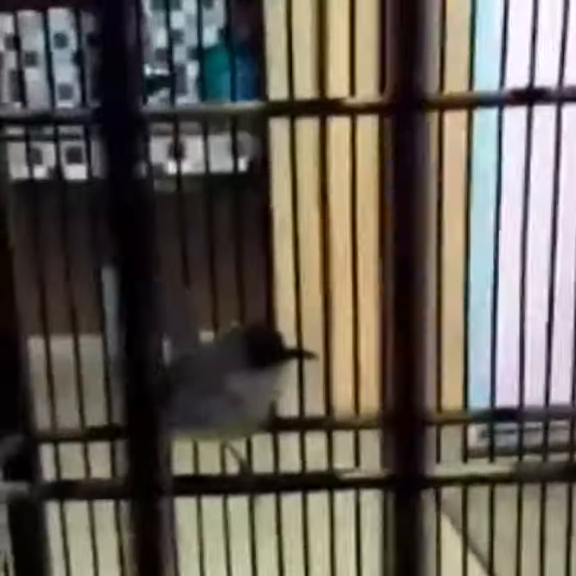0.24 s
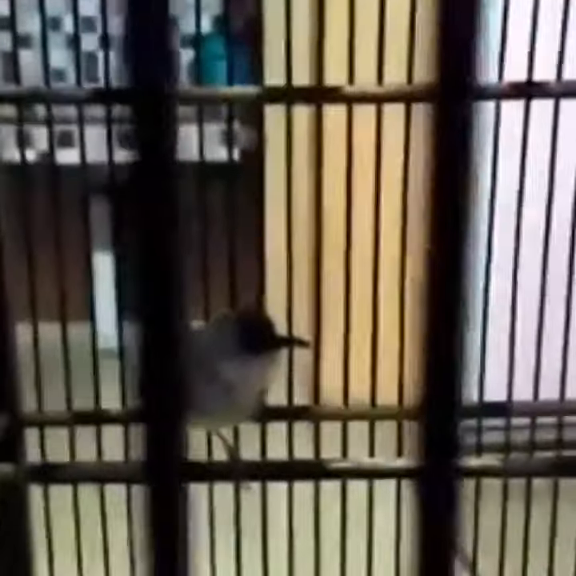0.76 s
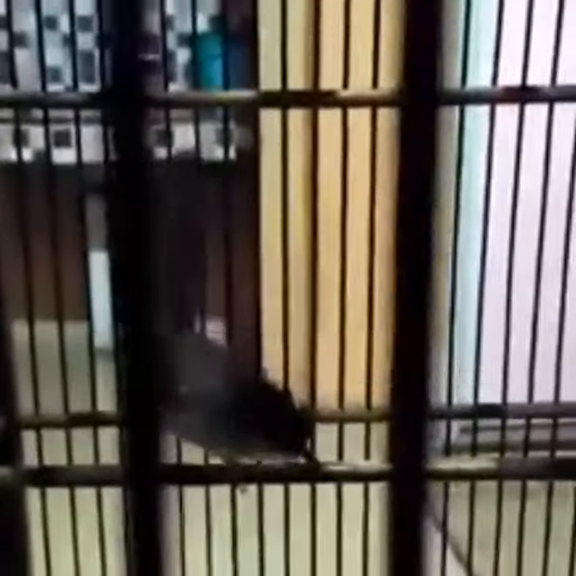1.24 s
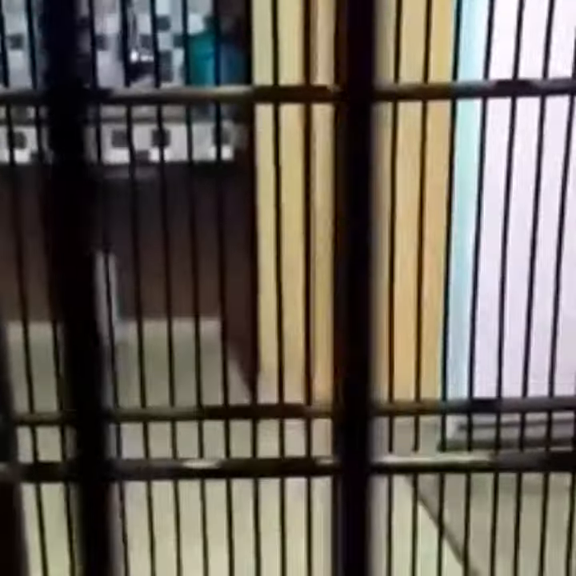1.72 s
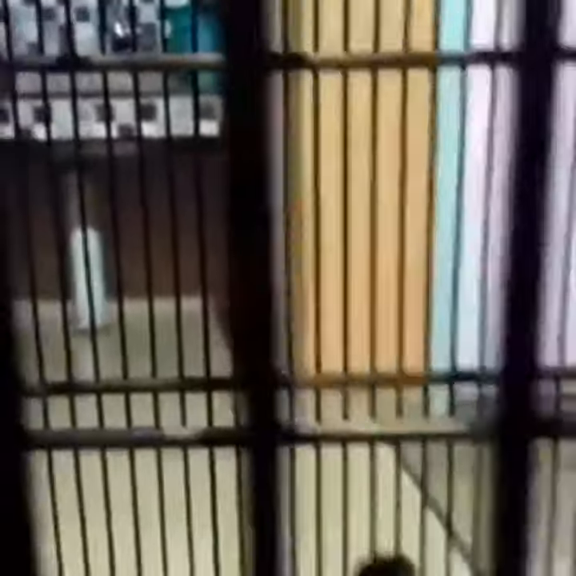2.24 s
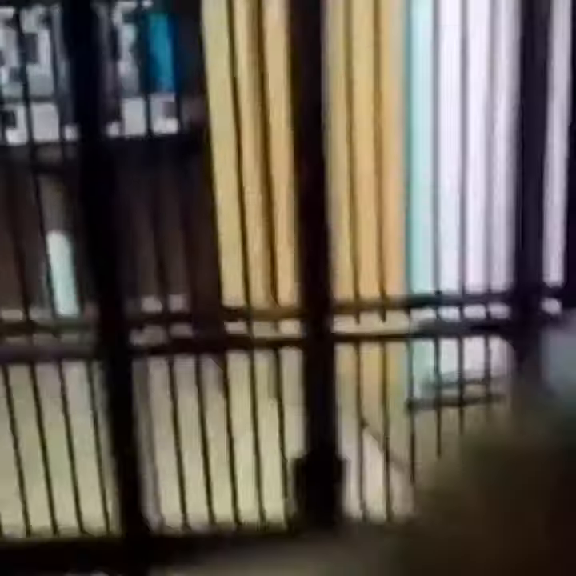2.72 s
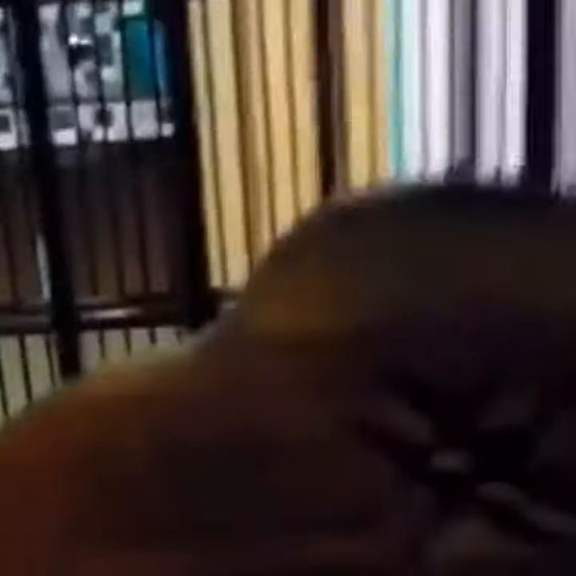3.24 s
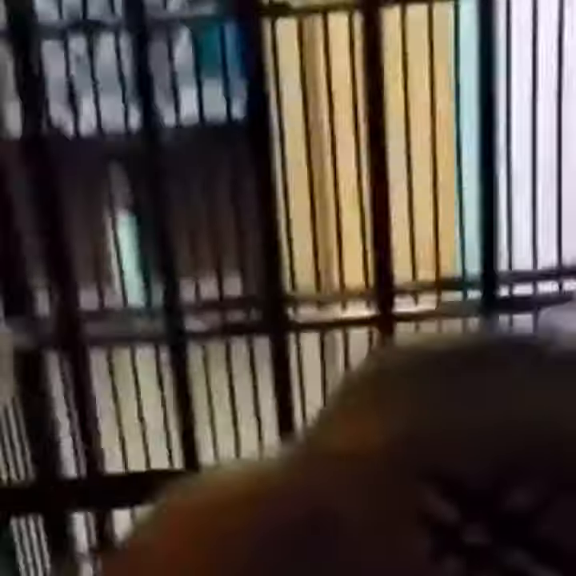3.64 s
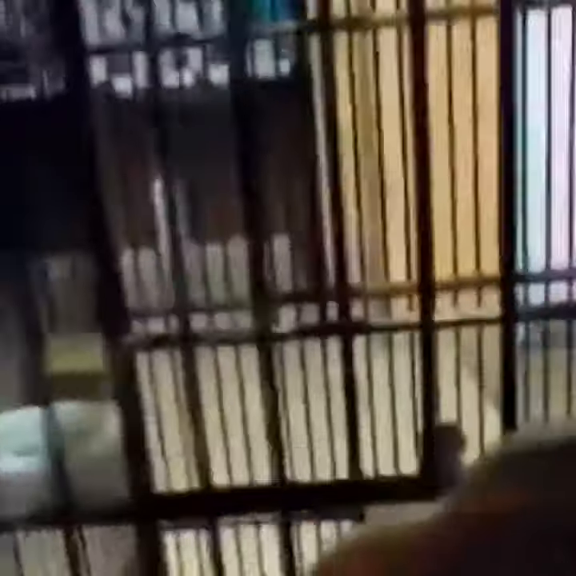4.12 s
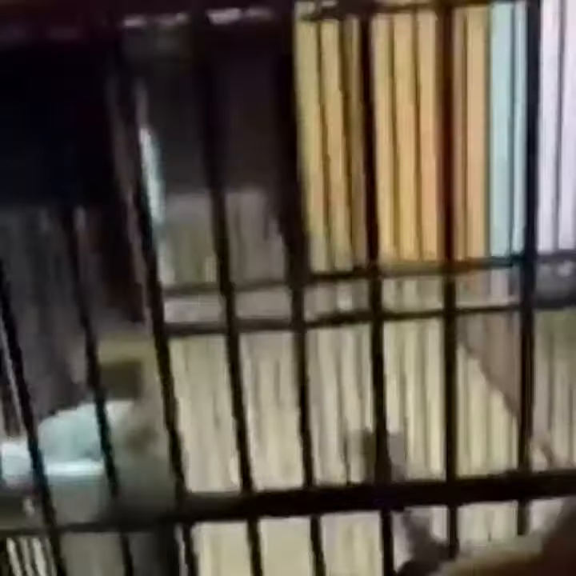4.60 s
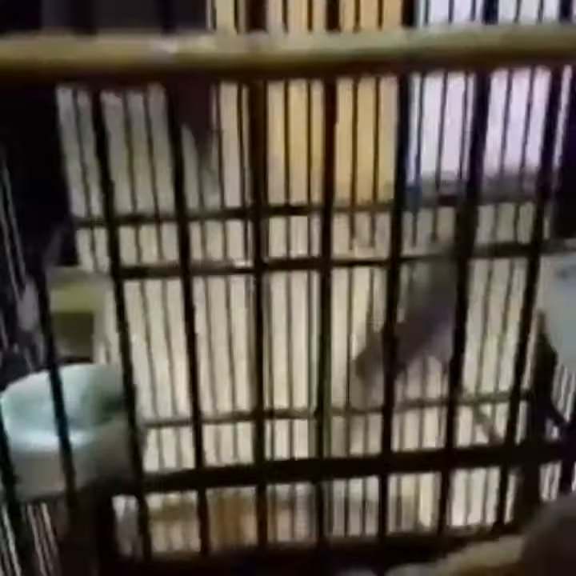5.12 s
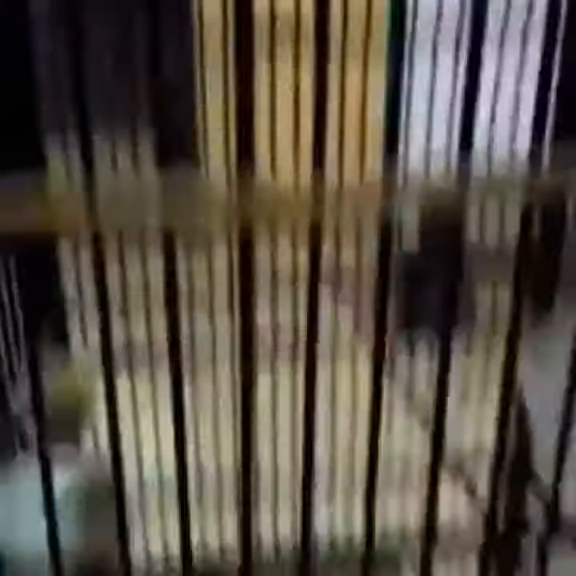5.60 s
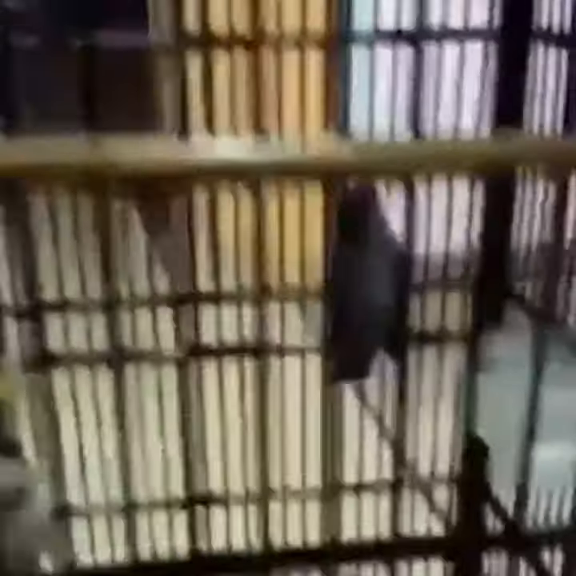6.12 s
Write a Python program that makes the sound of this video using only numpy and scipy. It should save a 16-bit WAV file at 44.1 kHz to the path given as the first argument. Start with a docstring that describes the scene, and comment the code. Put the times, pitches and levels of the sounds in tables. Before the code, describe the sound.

A small caged bird sings three fast runs of sharp chips over a dry rasp, with sliding buzzy wheezes and low whistles in a hard-walled room.

```python
"""A small caged bird sings in a hard-walled room: three runs of sharp down-swept chips over a dry rasp.
Buzzy wheezes slide down after two of the runs; an earlier one follows two high peeps.
Low whistles lead into two runs. A harsh hiss sounds twice, the first time just ending at the start.
Chips and whistles are swept sines; rasp, wheezes, peeps and hisses are uneven snaps plus air, filtered.
A hand rubs and bumps the camera, whose gain control ducks the room noise. Levels are set before it."""
import sys
import numpy as np
from scipy import signal
from scipy.fft import rfft, irfft, next_fast_len
from scipy.io import wavfile
from scipy.ndimage import uniform_filter1d, map_coordinates

SR = 44100
rng = np.random.default_rng(int(sys.argv[2]) if len(sys.argv) > 2 else 0)


def persist_wave(psi):
    """Save psi, clipped to +-1, as 16-bit WAV."""
    counts = np.round(np.clip(psi, -1, 1) * 32767).astype(np.int16)
    wavfile.write(sys.argv[1], SR, np.atleast_2d(counts).T)


N = 280035


def amp(db):
    """Decibels to gain."""
    return 10 ** (np.asarray(db) / 20)


def unit(x):
    """Scale to rms 1."""
    return x / np.sqrt(np.mean(x ** 2) + 1e-20)


def along(points, hz):
    """Read (Hz, value) points on a log frequency axis."""
    f, v = np.transpose(points)
    return np.interp(np.log(hz + 1), np.log(f + 1), v)


def wobble(knots_per_s):
    """A smooth random curve through normally distributed knots."""
    knots = rng.standard_normal(int(N * knots_per_s / SR) + 4)
    return map_coordinates(knots, [np.arange(N) * knots_per_s / SR])


def since(start_s):
    """Seconds from start_s, for every sample."""
    return np.arange(N) / SR - start_s


ONSET_DB = 30  # below full level at the start


def envelope(start_s, attack_s, length_s, release_db_per_s):
    """Gain that rises through the attack, holds until length_s after the start, then dies away."""
    u = since(start_s)
    rising = np.maximum(1 - u / attack_s, 0)
    db = -ONSET_DB * rising ** 2 - release_db_per_s * np.maximum(u - length_s, 0)
    return amp(np.maximum(db, -200))


def filtered(x, response):
    """x times a response of frequency."""
    m = next_fast_len(N + SR // 2)
    return irfft(rfft(x, m) * response(np.fft.rfftfreq(m, 1 / SR)), m)[..., :N]


def coloured(x, colour):
    """x weighted by a colour table, at rms 1."""
    return unit(filtered(x, lambda hz: amp(along(colour, hz))))


# left-right correlation of diffuse noise: freq_hz, likeness
ALIKE = [(100, 0.93), (1000, 0.96), (3000, 0.96), (6300, 0.92), (10000, 0.57)]


def diffuse(colour):
    """Stereo noise of rms 1 from all sides: a mid-side balance sets the likeness of the channels."""
    def balance(hz):
        turn = np.arccos(np.clip(along(ALIKE, hz), -1, 1)) / 2
        return np.array([np.cos(turn), np.sin(turn)])

    mid, side = filtered(rng.standard_normal((2, N)), balance)
    return coloured(np.array([mid + side, mid - side]), colour)


def buzz(rate_hz, jitter, air):
    """The syrinx snaps at an uneven rate, with rushing air between the snaps."""
    cycles = np.cumsum(rate_hz * np.exp(jitter * wobble(300))) / SR
    snaps = np.diff(np.floor(cycles), prepend=0) * amp(rng.standard_normal(N))
    return unit(unit(snaps) + air * rng.standard_normal(N))


RING_FLUTTER_DB, RING_FLUTTER_KNOTS_PER_S = 3, 45


def resonate(x, rings):
    """Each resonance lifts a narrow band and rings on briefly, swelling and sinking on its own."""
    def bandpasses(f):
        return np.array([1j * f * w / (c * c - f * f + 1j * f * w) for c, w, _ in rings])

    out = x
    for band, (_, _, db) in zip(filtered(x, bandpasses), rings):
        flutter_db = RING_FLUTTER_DB * (wobble(RING_FLUTTER_KNOTS_PER_S) - .5)
        out = out + band * amp(db + flutter_db)
    return unit(out)


def valley_db(hz, valleys):
    """Loss in the narrow bands that the throat does not pass."""
    return sum(db * np.exp(-((hz - c) / w) ** 2) for c, w, db in valleys)


def hollow(x, valleys):
    """x with those bands hollowed out."""
    return filtered(x, lambda hz: amp(valley_db(hz, valleys)))


def patchy(x, depth_db):
    """The sound flickers in patches about 500 Hz wide and 17 ms long."""
    z = signal.stft(x, nperseg=256)[2]
    field = uniform_filter1d(rng.standard_normal(z.shape), size=3, axis=0)
    field = uniform_filter1d(field, size=6, axis=1)
    return unit(signal.istft(z * amp(depth_db * unit(field)), nperseg=256)[1][:N])


# time for the room's ring to fall 60 dB: freq_hz, t60_s
WALLS = [(300, 0.77), (1300, 0.69), (4000, 0.75), (10000, 0.49)]


def in_room(x, wet_db, width):
    """Direct sound plus the walls' answer: decaying noise that differs a little between the channels."""
    hz, t, z = signal.stft(rng.standard_normal((2, SR * 3 // 4)), SR, nperseg=256)
    decay = amp(-60 * t / along(WALLS, hz)[:, None])
    tail = signal.istft(z * decay, SR, nperseg=256)[1]
    tail = np.pad(tail / np.linalg.norm(tail[0]), ((0, 0), (SR // 200, 0)))  # 5 ms pre-delay
    mid, side = amp(wet_db) * signal.fftconvolve(x[None], tail, axes=1)[:, :N]
    return np.array([x + mid + width * side, x + mid - width * side]) / np.sqrt(1 + amp(wet_db) ** 2)


# spectrum of the room's rush: freq_hz, weight_db
ROOM_COLOUR = [(25, -52), (60, -30.5), (100, -15.5), (300, -10), (480, -10.5), (700, -7.5), (950, -7),
               (1300, -7.5), (1520, -4.5), (1700, 0.5), (1900, -7), (2400, -8.5), (2900, -11),
               (5400, -15.5), (7000, -30), (8200, -36), (10000, -22), (10900, -70), (15000, -68)]
# spectrum of a narrow sizzle high in the room noise: freq_hz, weight_db
SIZZLE_COLOUR = [(4500, -53), (5700, -3), (6100, 4.5), (6350, 12.5), (6600, -3.5), (7100, -9.5),
                 (8000, -47)]


def room_noise(body_db=-59, sizzle_db=-61):
    """Diffuse noise: a rush whose level drifts slowly, and a high sizzle that flickers faster."""
    body = amp(body_db + 1.05 * wobble(4.6)) * diffuse(ROOM_COLOUR)
    return body + amp(sizzle_db + 1.93 * wobble(25)) * diffuse(SIZZLE_COLOUR)


SHIFT_ATTACK_S, SHIFT_RELEASE_DB_PER_S = 0.043, 400
# the hand shifts on the camera: start_s, length_s, rub_db, scratch_db
SHIFTS = [(3.08, 0.14, -67.5, -68), (3.313, 0.091, -53, -65), (3.438, 0.1, -53.5, -74),
          (3.531, 0.16, -54, -83), (3.658, 0.058, -64, -54)]
# spectra of skin on the case: freq_hz, weight_db
RUB_COLOUR = [(50, -42), (120, -31), (175, -19), (270, -5), (450, -16), (800, -22), (1200, 1), (1900, 7.5),
              (3000, 1.5), (4200, -5), (9000, -54)]
SCRATCH_COLOUR = [(2000, -9), (7000, 4.5), (10000, 2.5), (12500, -0.5), (15000, -31)]


def handling():
    """Skin rubs and scratches on the camera's case in uneven slips."""
    rub, scratch = diffuse(RUB_COLOUR), diffuse(SCRATCH_COLOUR)
    slips = unit(amp(1.5 * wobble(110)))
    out = 0
    for s, length, rub_db, scratch_db in SHIFTS:
        friction = amp(rub_db) * rub + amp(scratch_db) * scratch
        out = out + friction * envelope(s, SHIFT_ATTACK_S, length, SHIFT_RELEASE_DB_PER_S)
    return slips * out


# soft bumps of the hand on the camera: start_s, level_db
BUMPS = [(3.364, -48), (3.572, -46.5), (3.584, -56), (3.622, -67), (3.65, -50), (3.682, -49), (3.704, -51)]
# the grip rumbles between the bumps: start_s, length_s, level_db
GRIP_RUMBLE = (3.585, 0.1, -68)
# spectrum through the camera's body: freq_hz, weight_db
BUMP_COLOUR = [(60, -32), (130, -35), (180, 4.5), (280, 4), (450, -12), (620, -12), (850, 1), (1300, -6),
               (3000, -31), (8000, -64)]


def bumps(t60_s=0.056, attack_s=0.0077):
    """Dull, quickly damped knocks through the camera's body, over the rumble of the grip."""
    blows = 0
    for s, db in BUMPS:
        u = since(s)
        blows = blows + amp(db - 60 * np.maximum(u, 0) / t60_s) * np.clip(u / attack_s, 0, 1)
    start, length, level_db = GRIP_RUMBLE
    grip = amp(level_db) * envelope(start, SHIFT_ATTACK_S, length, SHIFT_RELEASE_DB_PER_S)
    return (blows + grip) * coloured(rng.standard_normal(N), BUMP_COLOUR)


HISS_ATTACK_S, HISS_TREBLE_ATTACK_S, HISS_RELEASE_DB_PER_S = 0.087, 0.1, 140
# hisses, with two resonances of their own: start_s, length_s, level_db, strong_ring_hz, upper_ring_hz
HISSES = [(-.1, 0.11, -32.5, 2520, 4040), (4.512, 0.22, -39, 2773, 5440)]
# source spectrum: freq_hz, weight_db
HISS_COLOUR = [(1200, -39), (1750, -13.5), (2050, -7), (2300, 3), (2550, -1.5), (3000, -3.5), (3300, 0.5),
               (3750, -5), (4400, -7), (5500, -7.5), (7100, -4.5), (8600, -20), (10600, -8.5), (12800, -42)]
# shared resonances: centre_hz, width_hz, lift_db (before flutter)
HISS_RINGS = [(1900, 90, -2), (2110, 55, 5), (2560, 45, 8), (3270, 80, 6), (3410, 70, 3), (4480, 45, 0),
              (7050, 80, 2), (10300, 70, 1)]
# valleys between them: centre_hz, width_hz, gain_db
HISS_VALLEYS = [(2250, 65, -10), (2410, 55, -15), (3010, 80, -14), (3660, 110, -10), (3980, 50, -7),
                (4380, 50, -6), (4650, 100, -8), (5380, 70, -6)]


def hiss(ring_width_hz=70, ring_db=13, upper_width_hz=160, upper_db=1, treble_hz=3800):
    """A harsh, breathy buzz through whistling resonances; the treble swells last."""
    out = np.zeros(N)
    source = coloured(buzz(rate_hz=300, jitter=.3, air=2.6), HISS_COLOUR)
    for s, length, db, hz, upper_hz in HISSES:
        own_rings = [(hz, ring_width_hz, ring_db), (upper_hz, upper_width_hz, upper_db)]
        air = hollow(resonate(source, HISS_RINGS + own_rings), HISS_VALLEYS)
        body = filtered(air, lambda f: 1 / (1 + (f / treble_hz) ** 8))
        for band, attack in ((body, HISS_ATTACK_S), (air - body, HISS_TREBLE_ATTACK_S)):
            out += band * amp(db) * envelope(s, attack, length, HISS_RELEASE_DB_PER_S)
    return out * amp(1.1 * wobble(60))


SCOOP_S, DROP_S, WHISTLE_RELEASE_DB_PER_S = 0.041, 0.0577, 1498
DROP_LOSS_DB = 27  # level loss per unit of drop; the overtones lose twice as much again
OVERTONE_FLICKER_DB, OVERTONE_FLICKER_KNOTS_PER_S = 4, 90
OVERTONE_BLUR_RAD, OVERTONE_BLUR_KNOTS_PER_S = .9, 220
# whistled notes: start_s, length_s, attack_s, level_db, pitch_hz,
# scoop (fraction below pitch), drop (fraction at the end), flutter_db, overtone_gain_db
WHISTLES = [(1.367, 0.12, 0.047, -30.5, 1400, 0.16, 0.2, 2.5, 15),
            (3.281, 0.13, 0.12, -29, 1401, 0.18, 0.02, 2, 11),
            (3.426, 0.1, 0.051, -37, 1459, 0.04, 0.01, 2.5, 9),
            (3.527, 0.049, .01, -40.5, 1463, 0.02, 0.05, 3, 14),
            (3.594, .028, 0.022, -44, 1505, 0, 0.03, -1, 2),
            (3.629, 0.023, 0.018, -34.5, 1490, 0, 0.01, 0, -4),
            (3.654, 0.0357, 0.0087, -52, 1527, 0.02, 0.1, 3.5, 0)]
# overtones: multiple, level_db (before overtone_gain_db)
OVERTONES = [(2, -46), (3, -43), (4, -51), (5, -43)]
# thin rush of air with a whistle: freq_hz, weight_db
AIR_COLOUR = [(1500, -16), (2500, 4), (4500, 0), (8000, 7), (12000, -2), (15000, -11)]


def whistles(air_db=-32, waver=0.0054):
    """Nearly pure notes over a little air: each may scoop up to its pitch, flutter and drop at the end."""
    out = np.zeros(N)
    air = amp(air_db) * coloured(rng.standard_normal(N), AIR_COLOUR)
    unsteady, flutter = 1 + waver * wobble(110), wobble(130)
    overtones = []
    for k, level in OVERTONES:
        gain = amp(level + OVERTONE_FLICKER_DB * wobble(OVERTONE_FLICKER_KNOTS_PER_S))
        blur = OVERTONE_BLUR_RAD * wobble(OVERTONE_BLUR_KNOTS_PER_S)
        overtones.append((k, gain, blur))
    for s, length, attack, db, hz, scoop, drop, flutter_db, bright_db in WHISTLES:
        u = since(s)
        fallen = drop * np.clip((u - length) / DROP_S + 1, 0, 1) ** 2
        pitch = hz * (1 - scoop * np.exp(-np.maximum(u, 0) / SCOOP_S)) * (1 - fallen)
        phase = 2 * np.pi * np.cumsum(pitch * unsteady) / SR
        brightness = amp(bright_db - 2 * DROP_LOSS_DB * fallen)
        upper = sum(gain * np.sin(k * phase + blur) for k, gain, blur in overtones)
        tone = unit(np.sin(phase) + brightness * upper)
        level = amp(db + flutter_db * flutter - DROP_LOSS_DB * fallen)
        out += (tone + air) * level * envelope(s, attack, length, WHISTLE_RELEASE_DB_PER_S)
    return out


# short, high peeps: start_s, length_s, level_db, pitch_hz
PEEPS = [(.362, 0.013, -54, 5960), (0.383, 0.017, -39.5, 5440)]


def peeps(width_hz=600, attack_s=0.0065, release_db_per_s=1500):
    """Brief buzzes in narrow bands that step down toward the wheeze."""
    source = buzz(rate_hz=450, jitter=0.086, air=0.8)
    out = 0
    for s, length, db, hz in PEEPS:
        band = unit(filtered(source, lambda f: np.exp(-((f - hz) / width_hz) ** 2)))
        out = out + amp(db) * band * envelope(s, attack_s, length, release_db_per_s)
    return out


RASP_ATTACK_S, RASP_RELEASE_DB_PER_S = 0.0099, 153
# the rasp under each run of chips: start_s, length_s, level_db
RUNS = [(1.546, 0.38, -42), (3.719, 0.25, -43), (5.007, 0.37, -42)]


def rasp_effort(push_db=1, push_s=0.014, pause_db=-5, pause_lead_s=0.014, pause_s=0.0046,
                slack_db=-3, slack_lag_s=0.039, slack_s=0.0039):
    """Gain of the rasp: falters just before each chip, is pushed with it and slackens after it."""
    runs = sum(amp(db) * envelope(s, RASP_ATTACK_S, length, RASP_RELEASE_DB_PER_S)
               for s, length, db in RUNS)

    def swell(s, width_s):
        return np.exp(-np.minimum((since(s) / width_s) ** 2, 20))

    effort_db = 0
    for s, *_ in CHIPS:
        effort_db = effort_db + push_db * swell(s + push_s / 2, push_s)
        effort_db = effort_db + pause_db * swell(s - pause_lead_s, pause_s)
        effort_db = effort_db + slack_db * swell(s + slack_lag_s, slack_s)
    return runs * amp(effort_db)


# source spectrum: freq_hz, weight_db
RASP_COLOUR = [(1200, -62), (1700, -5.5), (2100, -2), (2600, -3), (2900, 4), (3300, 1.5), (3800, 2),
               (4400, 0), (5200, 3.5), (6000, -3.5), (7000, -4.5), (8500, -27.5), (11000, -24),
               (14000, -64)]
# throat resonances: centre_hz, width_hz, lift_db (before flutter)
RASP_RINGS = [(2100, 110, 3), (2520, 110, 2), (2900, 110, 1), (3260, 90, 3), (3450, 90, 3), (4000, 120, 3),
              (4380, 160, 3), (5020, 260, 2), (5580, 140, 5), (5940, 90, 1)]
# valleys between them: centre_hz, width_hz, gain_db
RASP_VALLEYS = [(3080, 70, -4), (3730, 130, -4), (4680, 120, -9)]


def rasp():
    """A buzz broader and rougher than the wheeze, under and between the chips."""
    throat = resonate(coloured(buzz(rate_hz=260, jitter=.4, air=2.2), RASP_COLOUR), RASP_RINGS)
    throat = patchy(throat, depth_db=3)
    grain = amp(1.7 * wobble(140))
    return hollow(throat, RASP_VALLEYS) * rasp_effort() * grain


def slid(u, held_s, slide_s):
    """How far a wheeze has slid down, 0-1, u seconds after its start."""
    return np.clip((u - held_s) / slide_s, 0, 1)


# the lower edge settles from its top toward a shoulder, then slides to the bottom
EDGE_SHOULDER_HZ, EDGE_BOTTOM_HZ, SETTLE_S = 4080, 2155, 0.053
WHEEZE_FULL_S, WHEEZE_FADE_DB_PER_S, WHEEZE_RELEASE_DB_PER_S = 0.02, 63.5, 162
# wheezes, held high and then sliding down: start_s, held_s, slide_s, length_s, attack_s, edge_top_hz,
# high_level_db, low_level_db, crest_db (above the edge, while high), main_valley_hz
WHEEZES = [(0.404, 0.053, 0.044, 0.354, 0.0079, 4520, -32, -33.5, 10.5, 3680),
           (1.871, 0.066, 0.061, 0.37, 0.038, 5500, -40, -34.5, -2, 3950),
           (3.971, 0.035, 0.079, 0.36, 0.033, 5500, -43, -34, -4, 4070)]


def wheeze_edge(t):
    """At times t: the wheeze's lower edge in Hz, crest in dB, slide 0-1 and main valley in Hz."""
    edge = np.full(len(t), float(EDGE_SHOULDER_HZ))
    crest, lowered, valley = np.zeros(len(t)), np.zeros(len(t)), np.zeros(len(t))
    for s, held, slide, _, attack, top_hz, *_, crest_db, valley_hz in WHEEZES:
        settling = np.exp(-np.maximum(t - s, 0) / SETTLE_S)
        high = EDGE_SHOULDER_HZ + (top_hz - EDGE_SHOULDER_HZ) * settling
        sounding, down = t > s - 2 * attack, slid(t - s, held, slide)
        edge = np.where(sounding, high * (EDGE_BOTTOM_HZ / high) ** down, edge)
        crest = np.where(sounding, crest_db * (1 - down), crest)
        lowered = np.where(sounding, down, lowered)
        valley = np.where(sounding, valley_hz, valley)
    return edge, crest, lowered, valley


def wheeze_effort():
    """Gain of the wheezes: each moves from its high level to its low one in the slide, then fades."""
    gain = np.zeros(N)
    for s, held, slide, length, attack, _, high_db, low_db, *_ in WHEEZES:
        u, full = since(s), held + slide + WHEEZE_FULL_S
        db = high_db + (low_db - high_db) * slid(u, held, slide)
        db = db - WHEEZE_FADE_DB_PER_S * np.maximum(u - full, 0)
        gain += amp(db) * envelope(s, attack, length, WHEEZE_RELEASE_DB_PER_S)
    return gain


MAIN_VALLEY_WIDTH_HZ, MAIN_VALLEY_DB = 125, -12  # depth once fully slid
# source spectrum: freq_hz, weight_db
WHEEZE_COLOUR = [(1500, -30), (1980, -4), (2150, 0), (2500, 3.5), (3250, 1.5), (3550, -3.5), (3850, -11),
                 (4150, -5), (4400, -7), (4750, -2.5), (5300, -7.5), (5950, -5.5), (6400, -44),
                 (7200, -37.5), (11000, -38.5), (13500, -84)]
# throat resonances: centre_hz, width_hz, lift_db (before flutter)
WHEEZE_RINGS = [(2540, 70, 0), (2980, 70, 0), (3240, 100, 4), (4360, 170, 9), (4770, 80, -3),
                (5600, 110, 4), (5970, 120, 4)]
# valleys between them: centre_hz, width_hz, gain_db (once fully slid)
WHEEZE_VALLEYS = [(3620, 100, -5), (4660, 90, -4), (5120, 240, -6)]


def wheeze(crest_width=0.094):
    """A buzz in the throat: as the note slides down, lower resonances open and valleys form."""
    throat = resonate(coloured(buzz(rate_hz=400, jitter=.12, air=0.75), WHEEZE_COLOUR), WHEEZE_RINGS)
    throat = patchy(throat, depth_db=2)
    hz, t, z = signal.stft(throat, SR, nperseg=512)
    edge, crest_db, down, valley_hz = wheeze_edge(t)
    valleys = WHEEZE_VALLEYS + [(valley_hz, MAIN_VALLEY_WIDTH_HZ, MAIN_VALLEY_DB)]
    above = np.log((hz[:, None] + 1) / edge)
    opening = amp(np.sqrt(down) * valley_db(hz[:, None], valleys)) / np.sqrt(1 + np.exp(-44 * above))
    # crest just above the edge while the note is high
    opening = opening * amp(crest_db * np.exp(-(above / crest_width - 1.4) ** 2))
    # the note keeps its strength however few resonances are open
    power = np.mean(abs(z) ** 2, axis=1, keepdims=True)
    passed = np.sqrt((power * opening ** 2).sum(0) / power.sum())
    voice = signal.istft(z * opening / passed, SR, nperseg=512)[1][:N]
    return voice * wheeze_effort() * amp(0.88 * wobble(50))


CHIP_FALL_S, CHIP_HEAD_S = .0055, .003  # time to fall half way, width of the head
# chips: start_s, level_db, top_hz, foot_db (low foot relative to head), cutoff_s (after start)
CHIPS = [(1.531, -32.5, 5080, -7, 0.015), (1.608, -37, 5050, 1.5, 0.013), (1.694, -33, 4970, -2.5, 0.012),
         (1.779, -34.5, 5100, -3.5, 0.028), (1.873, -36.5, 4850, 2, 0.018), (3.721, -36, 5230, -2, 0.012),
         (3.806, -32, 5070, -5, 0.011), (3.8913, -32, 5120, -0.5, 0.015), (3.9753, -35.5, 4940, 4, 0.011),
         (5.015, -35, 4460, -1.5, 0.013), (5.097, -34.5, 5070, 2, 0.026), (5.185, -31.5, 4950, 3.5, 0.012),
         (5.2688, -31, 4930, -0.5, 0.012), (5.353, -39, 3400, 1, 0.0079)]
# spectrum of the noise burst in a chip: freq_hz, weight_db
SNAP_COLOUR = [(1500, -22), (3000, 5.5), (7200, 7), (8600, -14.5), (11000, -15.5), (14000, -42)]
# throat valleys: centre_hz, width_hz, gain_db
CHIP_VALLEYS = [(2750, 120, -4), (3850, 300, -8)]


def chips(bottom_hz=1780, second_hz=3270, second_db=-8, second_lead_s=0.0031, rough=0.38,
          near_db=-12, snap_db=-11):
    """One side of the syrinx holds high, then whips down until cut off; the other blips just ahead."""
    out, t = np.zeros(N), np.arange(-SR // 60, SR // 20) / SR
    grit, snap = wobble(700), coloured(rng.standard_normal(N), SNAP_COLOUR)

    def swell(centre_s, width_s):
        return np.exp(-((t - centre_s) / width_s) ** 2)

    for s, db, top_hz, foot_db, cutoff_s in CHIPS:
        at = round(s * SR) - SR // 60 + np.arange(len(t))
        roughness = rough * grit[at]
        pitch = bottom_hz + (top_hz - bottom_hz) / (1 + (np.maximum(t, 0) / CHIP_FALL_S) ** 2.29)
        shape = swell(0, CHIP_HEAD_S) + amp(foot_db) * swell(0.01, 0.007)
        shape = shape * np.clip((cutoff_s - t) / 0.0019, 0, 1)
        sweep = shape * np.sin(2 * np.pi * np.cumsum(pitch) / SR + 2 * roughness) * (1 + roughness)
        blip = amp(second_db) * swell(-second_lead_s, 0.0033) * np.sin(2 * np.pi * second_hz * t)
        burst = amp(snap_db) * swell(0.00079, 0.0052) * snap[at]
        chip = amp(db) * (np.sqrt(2) * (sweep + blip) + burst)
        # nearby surfaces answer within 1-7 ms, at delays drawn at random for each chip
        delays = rng.integers(SR // 1000, SR // 140, size=3)
        out[at] += chip + amp(near_db) * sum(np.roll(chip, d) for d in delays)
    return hollow(out, CHIP_VALLEYS)


def scene():
    """Song, whistles and hisses in the room, with handling, bumps and room noise."""
    song = in_room(wheeze() + peeps() + rasp(), wet_db=-6.0, width=0.2)
    song = song + in_room(chips(), wet_db=-10.5, width=0.33)
    whistling = in_room(whistles(), wet_db=-11, width=.12)
    hissing = in_room(hiss(), wet_db=-11.0, width=0.36)
    return song + whistling + hissing + handling() + bumps() + room_noise()


def gain_control(x, threshold_db=-47, slope=0.53, sense_hz=2450, window_s=0.0056):
    """The gain falls as the smoothed power passes a threshold; bass is sensed less than treble."""
    def sensitivity(hz):
        corner_hz = sense_hz / 2
        return 1.236 * hz ** 2 / (hz ** 2 + corner_hz ** 2) * hz / np.hypot(hz, corner_hz)

    sensed = filtered(x.mean(0), sensitivity)
    keep = np.exp(-1 / (window_s * SR))
    settled = [np.mean(sensed[:SR // 50] ** 2)]
    power = signal.lfilter([1 - keep], [1, -keep], sensed ** 2, zi=settled)[0]
    excess_db = np.maximum(10 * np.log10(power + 1e-12) - threshold_db, 0)
    return x * amp(-slope * excess_db)


TOP_HZ = 15100


def record(dry):
    """The camera's gain control and band limit."""
    return filtered(gain_control(dry), lambda hz: hz < TOP_HZ)


dry = scene()
out = record(dry)
persist_wave(out)
```